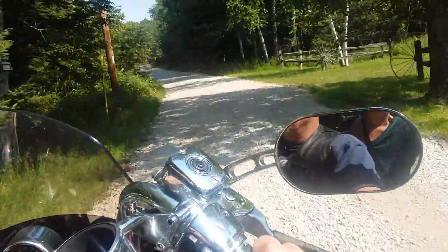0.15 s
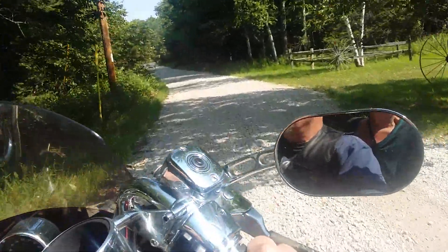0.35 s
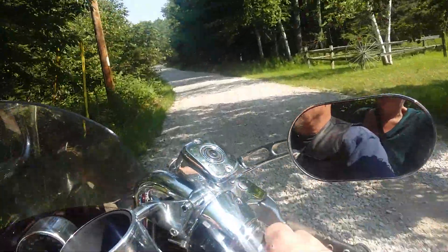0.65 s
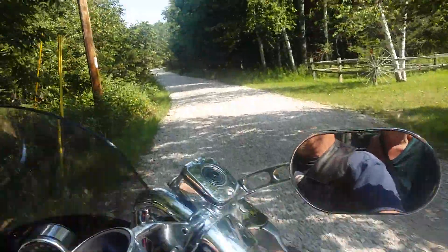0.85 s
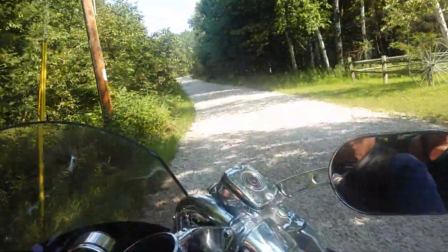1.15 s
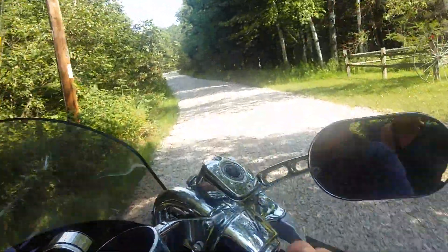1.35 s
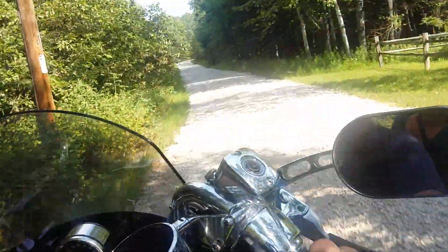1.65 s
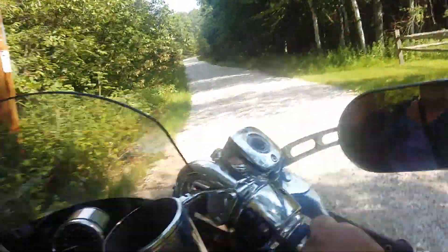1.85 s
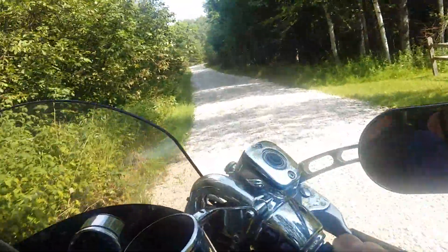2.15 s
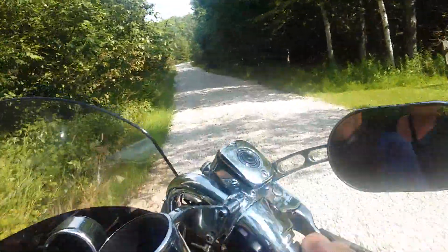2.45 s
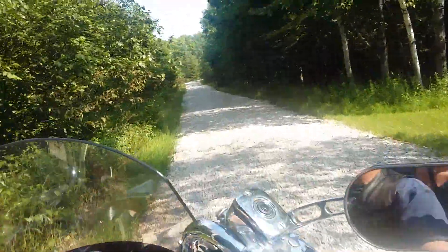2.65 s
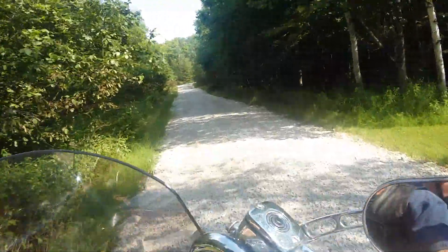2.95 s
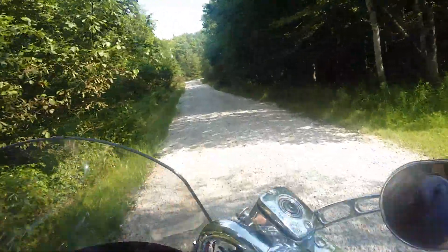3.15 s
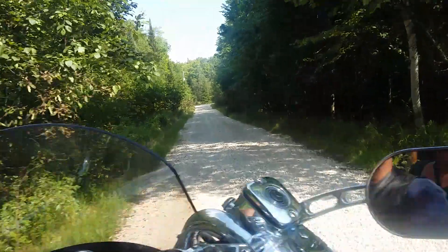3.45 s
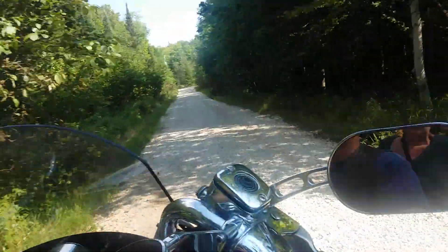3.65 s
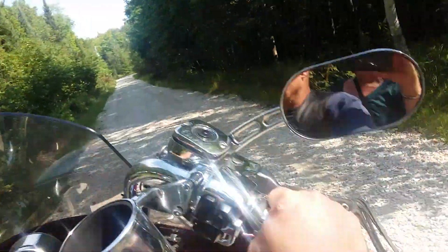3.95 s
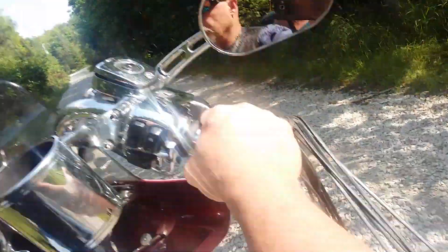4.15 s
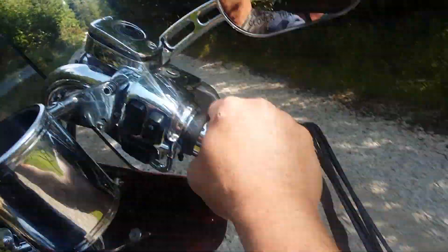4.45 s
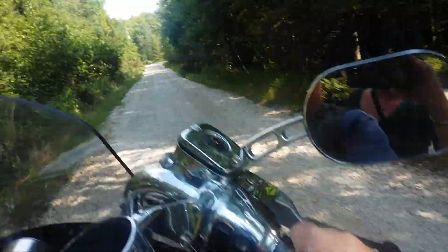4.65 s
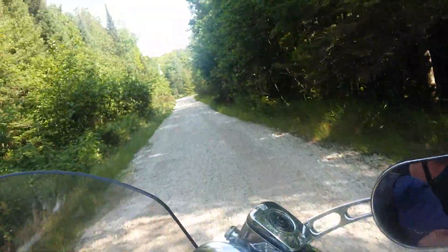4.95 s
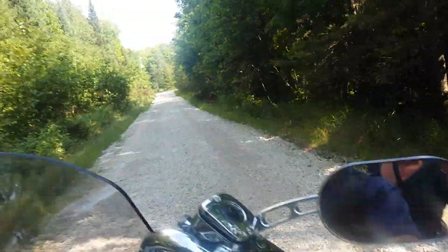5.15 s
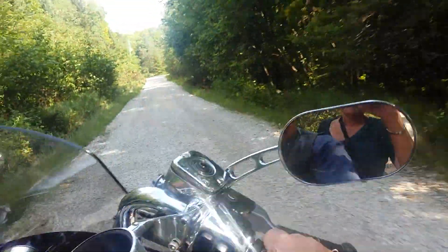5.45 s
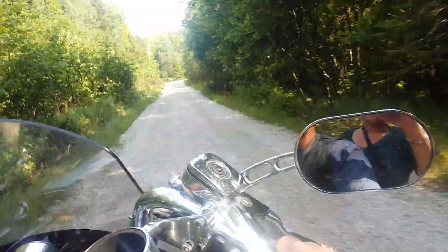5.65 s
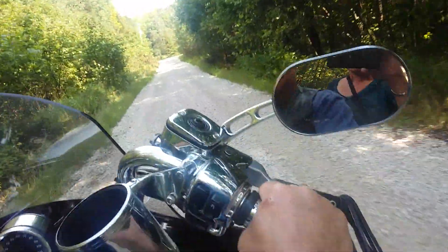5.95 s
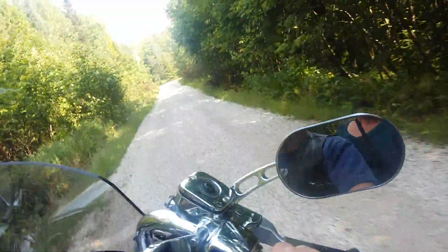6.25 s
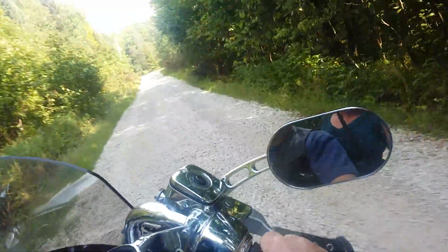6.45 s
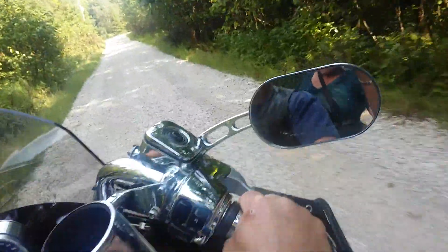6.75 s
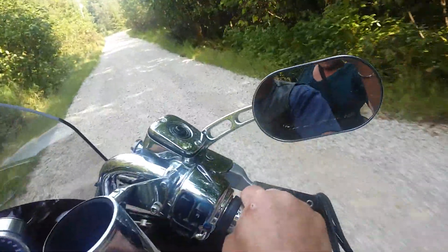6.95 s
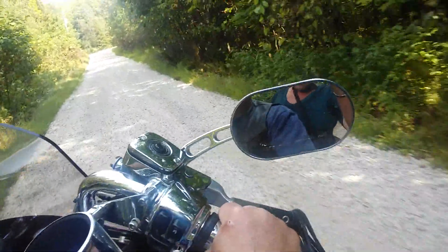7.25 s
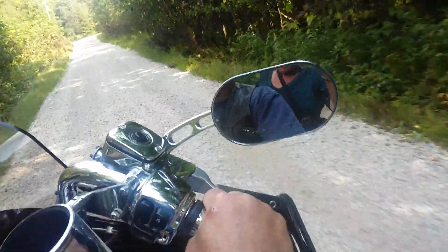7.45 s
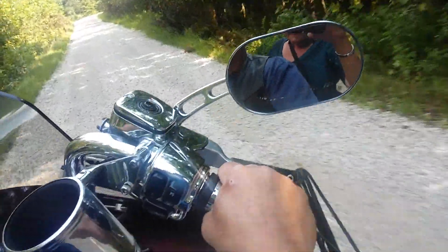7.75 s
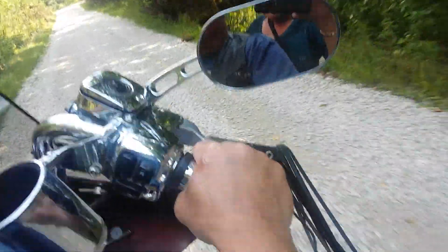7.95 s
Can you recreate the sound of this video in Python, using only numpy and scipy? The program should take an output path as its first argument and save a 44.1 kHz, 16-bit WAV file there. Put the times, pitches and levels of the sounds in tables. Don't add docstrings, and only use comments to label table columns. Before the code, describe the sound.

A steady motorcycle engine chugs at about sixteen lopsided firing cycles a second, its pipes booming and metal covers ringing. Beneath it, gravel roars and hisses in shifting patches, with tiny clicks and a cluster of firm knocks around three to four and a half seconds. Gusts slap the onboard stereo microphone, mostly on the right, with one especially heavy thump near five seconds.

```python
import sys
import numpy as np
from scipy import signal
from scipy.fft import rfft, irfft, next_fast_len
from scipy.io import wavfile
from scipy.ndimage import uniform_filter1d, minimum_filter1d

SR = 44100
rng = np.random.default_rng(int(sys.argv[2]) if len(sys.argv) > 2 else 0)


def natural_amplitude(level_db):
    exponent = np.asarray(level_db, float) / 20
    return 10 ** exponent


def generate_wav(signal):
    frames = np.transpose(np.atleast_2d(signal))
    scaled = np.clip(frames, -1, 1) * 32767
    pcm = np.round(scaled).astype(np.int16)
    wavfile.write(sys.argv[1], SR, pcm)


N = 356769
PORT_LAG = 9


def level(x, db):
    return x * natural_amplitude(db) / np.sqrt(np.mean(x ** 2))


def curves(table):
    s, *columns = np.transpose(table)
    return np.array([np.interp(np.arange(N) / SR, s, c) for c in columns])


def ring(x, hz, t60_s):
    r = np.exp(-np.log(1000) / (max(t60_s, .002) * SR))
    w = 2 * np.pi * hz / SR
    return signal.lfilter([0, r * np.sin(w)], [1, -2 * r * np.cos(w), r * r], x)


def band(x, hz, width_hz):
    return signal.lfilter(*signal.iirpeak(hz, hz / width_hz, SR), x)


def colour(x, spectrum):
    hz, db = np.transpose(spectrum)
    size = next_fast_len(N)
    log_f = np.log(np.arange(1, size // 2 + 2) * SR / size)
    gain = natural_amplitude(np.interp(log_f, np.log(hz), db))
    return irfft(rfft(x, size) * gain, size)[..., :N]


def walk(rate_hz):
    hold = int(SR / rate_hz)
    steps = np.repeat(rng.standard_normal(N // hold + 1), hold)
    return uniform_filter1d(uniform_filter1d(steps, hold), hold)[:N]


def strikes(cycle, place, jitter_ms, scatter_db):
    turns = np.arange(np.ceil(cycle[0] - place), cycle[-1] - place)
    jitter, scatter = rng.standard_normal((2, len(turns)))
    at = np.interp(turns + place, cycle, np.arange(len(cycle))) + jitter_ms * SR / 1000 * jitter
    at = np.clip(at, 0, len(cycle) - 2)
    force = natural_amplitude(scatter_db * scatter)
    out = np.zeros(len(cycle))
    np.add.at(out, at.astype(int), force * (1 - at % 1))
    np.add.at(out, at.astype(int) + 1, force * (at % 1))
    return out


def wind():
    # start_s, level_db, left_lean_db
    gusts = [(0, -19.5, -8.5), (.6, -25.5, -3), (.95, -24, -11), (1.6, -22, -10.5), (2.0, -22.5, -11),
             (2.55, -23.5, -10.5), (2.7, -36, -0.5), (3.4, -26, -4.5), (3.8, -21.5, -8), (4.4, -23.5, 5),
             (4.6, -25.5, 3.5), (4.9, -19.5, 4.5), (5.2, -28, 1), (5.6, -17, -0.5), (6.1, -22, 1),
             (6.6, -19, -0.5), (7.5, -22, -11), (8.09, -18.5, 1)]
    # peak_s, slap_db, puff_db, port (0 left, 1 right)
    thumps = [(0.255, -14, -19, 1), (0.477, -13, -18, 0), (.554, -12.5, -11, 1), (.578, -12, -19.5, 0),
              (.721, -14, -16, 0), (0.835, -6.5, -9.5, 1), (.877, -7.5, -6.5, 1), (1.118, -9, -18.5, 1),
              (1.228, -12, -15, 1), (1.271, -9, -9, 1), (1.529, -6, -3.5, 1), (1.585, -22, 0, 1),
              (1.686, -11, -3, 1), (1.972, -10, -23, 1), (2.238, -16, -9.5, 1), (2.455, -12, -17, 0),
              (2.564, -12, -7.5, 1), (2.641, -21.5, -4.5, 1), (3.763, -21, -20, 0), (4.795, -3, 1.5, 1),
              (5.609, -17, -20, 0), (5.646, -22, -6, 1), (6.077, -11.5, -17.5, 1), (6.25, -9, -4, 0),
              (6.675, -8, -5.5, 1), (7.002, -6.5, -6.5, 1), (7.098, -25, -9.5, 1), (7.409, -10.5, -12.5, 1),
              (7.538, -15.5, -20.5, 1), (7.815, -12, -6.5, 0)]
    # freq_hz, density_db
    buffeting = [(20, -24), (45, -11), (90, -2), (130, 0), (200, -1), (300, -7), (500, -15), (900, -22),
                 (1500, -35), (5000, -90)]
    slap_hz, puff_hz, pitch_scatter = (550, 492), 207, 0.098
    small_slaps_per_s, small_slap_db = 9, 5

    gust_db, lean_db = curves(gusts)
    flutter_db = 1.5 * np.array([walk(8.6), walk(7)])
    port_db = gust_db + lean_db * np.array([[.5], [-.5]]) + flutter_db
    lumps = natural_amplitude(4.5 * np.array([walk(45), walk(45)]))
    out = level(colour(lumps * rng.standard_normal((2, N)), buffeting), -2.4) * natural_amplitude(port_db)

    rows = []
    for s, slap_db, puff_db, port in thumps:
        port = int(port + .5)
        rows += [(s, slap_db, slap_hz[port], port), (s, puff_db, puff_hz, port)]
    chance = rng.random((2, N // 100 - 40)) < small_slaps_per_s * 100 / SR
    for port, at in np.argwhere(chance) * [1, 100] + [0, 1000]:
        rows.append((at / SR, port_db[port, at] + small_slap_db, slap_hz[port], port))

    t = np.arange(SR // 40) / SR
    for (s, db, hz, port), (sign, detune) in zip(rows, rng.standard_normal((len(rows), 2))):
        hz = hz * (1 + pitch_scatter * detune)
        at = int((s - 1 / hz) * SR)
        turns = hz * t
        swing = np.sin(2 * np.pi * turns * (1.25 - .1 * np.minimum(turns, 3)))
        puff = swing * turns * np.exp(1 - turns)
        out[port, at:at + len(t)] += natural_amplitude(db) * np.sign(sign) * puff
    return out


def shake():
    hz, width_hz = 80.8, 54
    rumble = band(band(rng.standard_normal(N), hz, width_hz), hz, width_hz)
    return level(rumble * natural_amplitude(3.2 * walk(11)), -26) * natural_amplitude([[-1.4], [1.4]])


def thrown_stones():
    # start_s, peak_db, left_minus_right_db
    stones = [(0.112, -47.5, -2), (0.2883, -43.5, 5), (0.6696, -43.5, -2), (0.9278, -41.5, -1),
              (1.173, -54.5, -5.5), (1.4272, -41.5, -4.5), (1.681, -52.5, -9.5), (1.9684, -42.5, -1.5),
              (1.992, -42.5, 6), (2.82, -56.5, 1.5), (2.953, -53, 1), (3.3908, -48.5, -0.5),
              (3.5263, -47, -1.0), (3.651, -51.5, -4.5), (3.688, -41.5, 6), (3.796, -48.5, -3.5),
              (3.9866, -47, -3), (4.144, -50, 7.5), (4.3452, -52, 0.5), (4.9192, -46.5, 6.5),
              (5.472, -43, 1.5), (5.894, -55.5, -1.5), (6.0223, -51.5, -3.5), (6.111, -51, -9.5),
              (6.641, -51, 0), (6.914, -52, 2.5), (7.3173, -42.5, 3), (7.5996, -50.5, -2), (7.611, -47, -2),
              (7.8288, -47.5, 7.5)]
    clicks = np.zeros((2, N))
    for s, db, pan_db in stones:
        clicks[:, int(s * SR)] += natural_amplitude(db + np.array([pan_db, -pan_db]) / 2)
    burst = signal.lfilter([1], [1, -np.exp(-1000 / (2.5 * SR))], clicks) * rng.standard_normal((2, N))
    return band(band(burst, 10500, 9000), 10500, 9000)


def gravel(loose_db):
    # freq_hz, density_db
    road = [(180, -35), (300, -5), (410, -14), (590, -17), (684, -14), (794, -16), (1260, -20.5),
            (1840, -19.5), (2210, -27), (3070, -29), (3340, -29), (4800, -25), (5840, -30.5), (8000, -44.5),
            (15500, -43.5)]
    # freq_hz, left_minus_right_db
    road_pan = [(400, -0.5), (800, -1), (1300, 5.5), (2400, -3.5), (4400, -1.5), (7500, -6.5), (14000, 3.5)]
    # freq_hz, level_db
    road_alike = [(300, 4), (500, -0.5), (900, 3.5), (1300, -6), (1900, 2.5), (2400, -10), (3100, -3.5),
                  (6500, -13.5)]
    # freq_hz, gain_db
    housing = [(1050, -0.5), (1260, -2), (1420, 1), (1650, -2), (2000, -0.5), (2300, 2), (5900, 0),
               (6350, -4), (7000, -3)]
    grit_db = -62.5 + .6 * loose_db

    hits = rng.random((3, N)) < 2500 / SR
    stone_size = natural_amplitude(2.5 * np.minimum(rng.exponential(size=(3, N)), 4))
    grains = hits * rng.standard_normal((3, N)) * stone_size
    left, right, both = level(grains, -7.0) + rng.standard_normal((3, N))
    both = colour(both, road_alike)
    half_pan = np.multiply(road_pan, [1, .5])
    left = colour(left + both, half_pan)
    right = colour(right + np.roll(both, PORT_LAG), half_pan * [1, -1])
    offset = np.multiply(road_alike, [1, -.3]) - [0, 1]
    crunch = colour(np.array([left, right]), np.minimum(offset, [SR, 0]))
    crunch = colour(crunch, road)

    low = signal.sosfilt(signal.butter(4, 7200, "low", fs=SR, output="sos"), crunch)
    high = signal.sosfilt(signal.butter(4, 7200, "high", fs=SR, output="sos"), crunch)
    coarse = signal.sosfiltfilt(signal.butter(4, 3400, fs=SR, output="sos"), low)
    fine = low - coarse
    coarse_patches = natural_amplitude(walk(3.1) + 1.6 * walk(30))
    fine_patches = natural_amplitude(loose_db - loose_db.mean() + walk(25))
    roar = level(colour(coarse * coarse_patches + fine * fine_patches, housing), -30.5)
    high = colour(high, [(8000, -2.5), (11000, -1.0), (13000, -3.0), (15500, -5.0)])
    grit = level(high, 4.4) * natural_amplitude(grit_db + walk(9.8) + 1.9 * walk(55))
    return roar + grit


def bumps():
    # start_s, peak_db, pitch_hz
    hits = [
        (0.762, -17.5, 580),
        (2.056, -21, 697),
        (3.011, -15, 700),
        (3.172, -17, 579),
        (3.759, -10.5, 725),
        (3.987, -21, 567),
        (4.264, -20, 805),
        (4.394, -20, 804),
        (6.935, -23.5, 579),
    ]
    t60_s, trim_db = 0.019, -1.5
    out = np.zeros(N)
    tap = np.r_[1., np.zeros(SR // 20)]
    for s, db, hz in hits:
        tube = ring(tap, hz, t60_s) + .6 * ring(tap, 1.1 * hz, t60_s)
        out[int(s * SR):][:len(tap)] += natural_amplitude(db + trim_db) * tube
    return np.array([out, np.roll(out, PORT_LAG)])


def port_noise(shared_gain):
    shared = rng.standard_normal(N)
    return rng.standard_normal((2, N)) + shared_gain * np.array([shared, np.roll(shared, PORT_LAG)])


def valve_gear(cycle):
    # place_cycles, freq_hz, width_hz, level_db, decay_ms, left_minus_right_db
    clacks = [
        (.03, 612, 261, -26, 3.9, 1),
        (.455, 940, 412, -32, 10, 4),
        (.05, 1910, 497, -39, 26, 1.5),
        (.05, 4450, 1377, -38.5, 8.1, -4),
        (.49, 4500, 1413, -37.5, 9, -4),
        (0.702, 8940, 6920, -57.5, 12, 6),
        (0.721, 1410, 500, -36, 14, 3.5),
    ]
    out = np.zeros((2, N))
    for place, hz, width_hz, db, decay_ms, pan_db in clacks:
        fade = np.exp(-1000 / (decay_ms * SR))
        gate = signal.lfilter([1], [1, -fade], strikes(cycle, place, jitter_ms=0.95, scatter_db=3.0))
        gate = uniform_filter1d(gate, 30)
        noise = level(band(port_noise(min(1100 / hz, 1.5)), hz, width_hz), db)
        out += band(noise * gate, hz, 2.0 * width_hz) * natural_amplitude([[pan_db / 2], [-pan_db / 2]])
    return out


def casing(cycle):
    # freq_hz, width_hz, level_db
    covers = [(1407, 130, -49), (1460, 37, -55.5), (1893, 54, -46), (2004, 22, -57), (2850, 120, -53.5),
              (3027, 50, -54), (4310, 340, -54), (4780, 210, -54.5), (5640, 330, -57.5), (6740, 220, -61.5)]
    out = np.zeros((2, N))
    for hz, width_hz, db in covers:
        ringing = band(band(port_noise(1.1), hz, width_hz), hz, width_hz)
        swell_db = 2.0 * np.cos(4 * np.pi * (cycle - .05))
        out += level(ringing * natural_amplitude(2.5 * walk(2) + 2.1 * walk(16) + swell_db), db)
    return out


def knocks(cycle):
    # place_cycles, freq_hz, t60_s, left_db, right_db
    cracks = [
        (.996, 600, .016, -24.5, -23.5),
        (.126, 580, .021, -29, -26),
        (.2, 410, .035, -31, -30),
        (.3, 800, .02, -30, -31),
        (.445, 785, .021, -26.5, -28),
        (.55, 880, .02, -31, -32),
        (.76, 410, .03, -33, -33),
    ]
    out = np.zeros((2, N))
    for place, hz, t60_s, left_db, right_db in cracks:
        crack = ring(ring(strikes(cycle, place, jitter_ms=.2, scatter_db=2.0), hz, t60_s), hz, t60_s)
        crack = crack * 2 * np.e * np.log(1000) / (t60_s * SR)
        out += [crack * natural_amplitude(left_db), np.roll(crack, 11) * natural_amplitude(right_db)]
    return out


def exhaust(cycle, load_db):
    firing = (.027, .439)
    # freq_hz, t60_s, front_swing, rear_swing
    modes = [(79.94, 0.37, 0.04, 0.058), (121.9, 0.66, -0.049, -0.1), (152, 0.11, -0.34, 0.015),
             (184.6, 0.19, -0.29, 0.051), (215.1, 0.18, 0.32, 0.072), (258.9, 0.26, 0.024, -0.1),
             (293.5, 0.15, 0.13, -0.0048), (329.7, 0.72, 0.0197, 0.0123), (371, 0.084, 0.006, -0.014)]
    # freq_hz, gain_db
    pipe_end = [(25, -13.5), (33, -12), (42, -8), (52, -5.5), (63, 7), (72, 4), (88, 0), (100, 5.5),
                (118, -4), (140, 1), (1200, 0), (4000, -13), (9000, -33.5)]
    # freq_hz, left_minus_right_db
    ports = [(80, -2.8), (150, -3.5), (205, -2), (285, 1), (400, -2)]
    boom_db = -18 + load_db + 0.47 * walk(4)
    bark_db = -13.5 + load_db

    run_up = SR // 2
    before = cycle[0] - (cycle[1] - cycle[0]) * np.arange(run_up, 0, -1)
    cycle = np.r_[before, cycle]
    front = strikes(cycle, firing[0], jitter_ms=.12, scatter_db=1.0)
    rear = strikes(cycle, firing[1], jitter_ms=.4, scatter_db=1.6)
    boom, *bark = (ring(a * front + b * rear, hz, t60_s)[run_up:] for hz, t60_s, a, b in modes)
    pipes = level(boom, 0) * natural_amplitude(boom_db) + level(sum(bark), 0.89) * natural_amplitude(bark_db)
    pipes = colour(pipes, pipe_end)
    left = colour(np.roll(pipes, -9), np.multiply(ports, [1, .5]))
    right = colour(np.roll(pipes, 9), np.multiply(ports, [1, -.5]))
    return np.array([left, right])


def scene():
    # start_s, crank_rpm
    crank = [(0.0, 1899.3), (0.64, 1908.3), (0.65, 1887.4), (1.66, 1903.1), (2.39, 1900.7), (2.52, 1865.4),
             (2.96, 1878.9), (3.29, 1933.8), (3.84, 1897.4), (4.11, 1907.1), (4.49, 1904.0), (5.34, 1928.2),
             (5.57, 1943.7), (6.45, 1883.0), (6.68, 1908.7), (7.4, 1897.2), (7.74, 1863.8), (8.09, 1902.0)]
    # start_s, load_db
    throttle = [(0, -2), (1.6, -.5), (2.0, -1), (2.6, -2), (3.3, -1.5), (4.6, 0), (4.9, -1), (6.5, -1.5),
                (8.09, -1.5)]
    # start_s, loose_db
    bed = [(0, 0), (.8, 0), (1.4, 1), (2.05, 3), (2.4, -0.5), (3.1, 0), (3.45, 2.5), (4.0, 1.5), (4.6, 2.5),
           (5.05, 1.5), (5.65, 3), (5.9, 0), (6.3, -0.5), (6.5, -1), (7.0, 2), (7.35, -2), (7.9, 1),
           (8.09, -0.5)]
    cycle = -.078 + np.cumsum(curves(crank)[0]) / 120 / SR
    load_db, loose_db = curves(throttle)[0], curves(bed)[0]
    road = wind() + shake() + gravel(loose_db) + thrown_stones() + bumps()
    engine = valve_gear(cycle) + casing(cycle) + knocks(cycle) + exhaust(cycle, load_db)
    return road + engine


def roll_off(x):
    return signal.sosfilt(signal.butter(12, 15620, fs=SR, output="sos"), x)


def record(dry):
    x = signal.sosfilt(signal.butter(2, 22, "high", fs=SR, output="sos"), dry)
    bass = signal.sosfiltfilt(signal.butter(2, 1200, fs=SR, output="sos"), x)
    hold = 300
    gain = np.minimum(1, .91 / (np.abs(bass).max(0) + 1e-9))
    gain = uniform_filter1d(minimum_filter1d(gain, 2 * hold), hold)
    return roll_off(x - bass * (1 - gain))


dry = scene()
out = record(dry)
generate_wav(out)
```